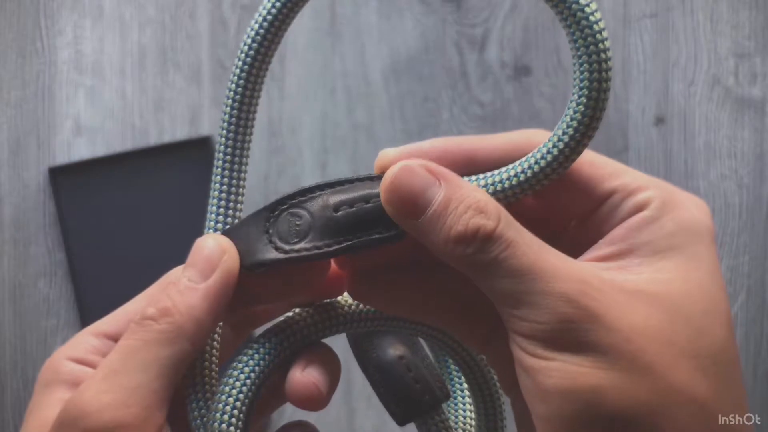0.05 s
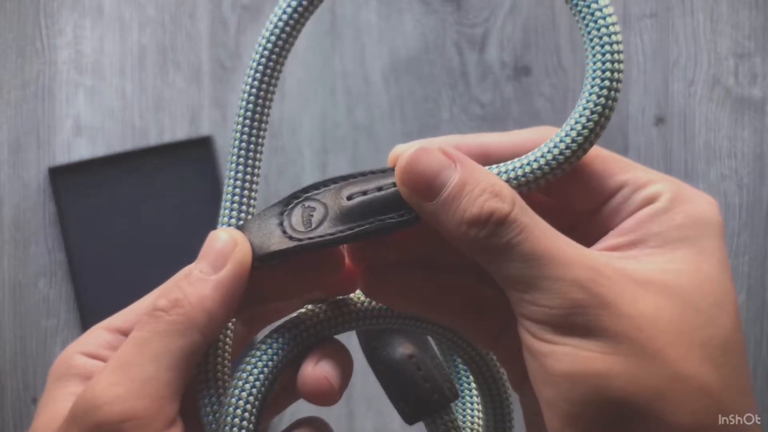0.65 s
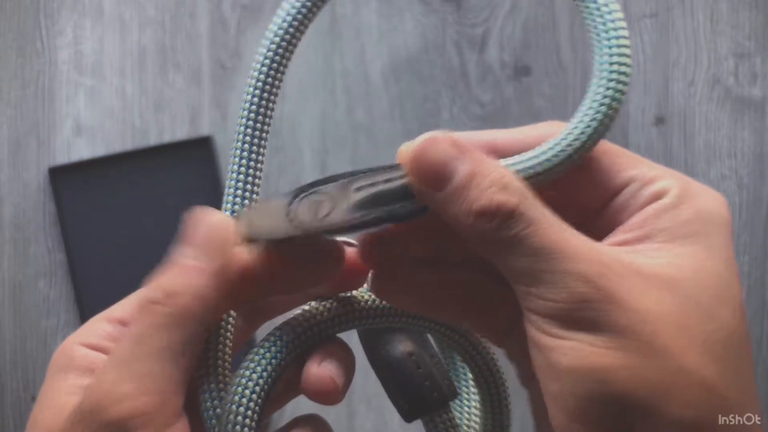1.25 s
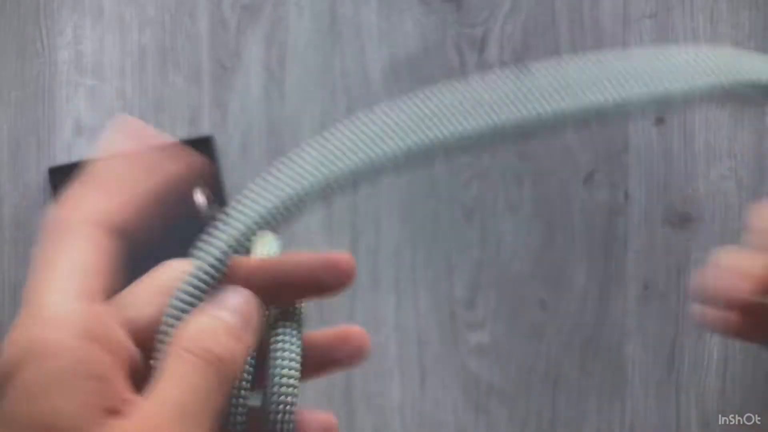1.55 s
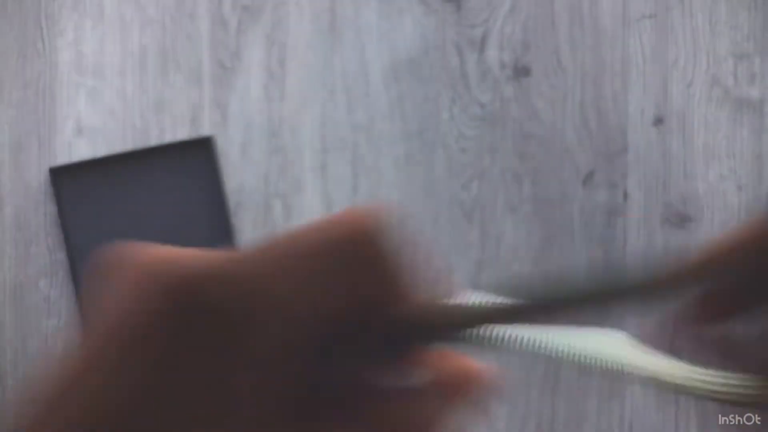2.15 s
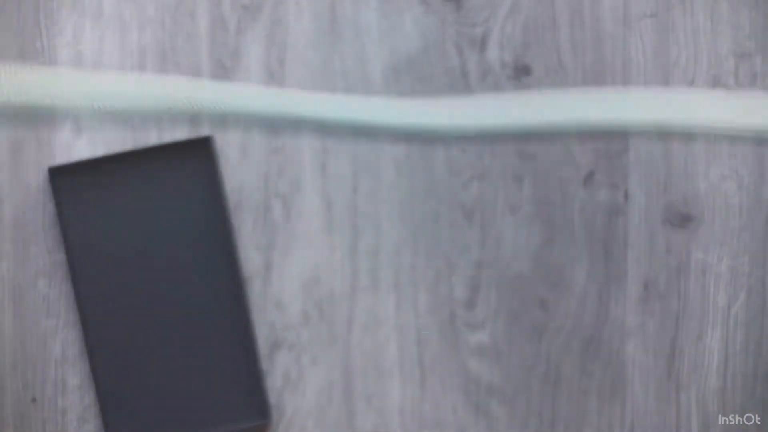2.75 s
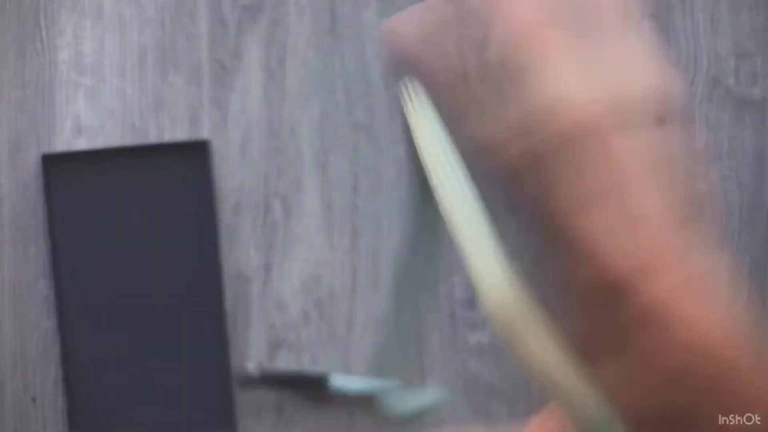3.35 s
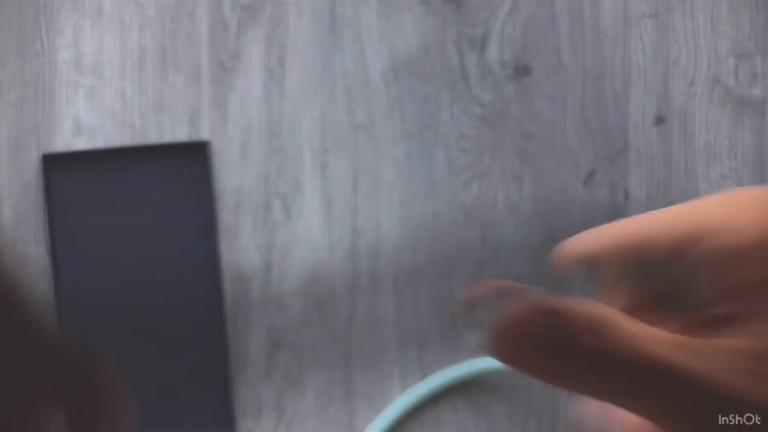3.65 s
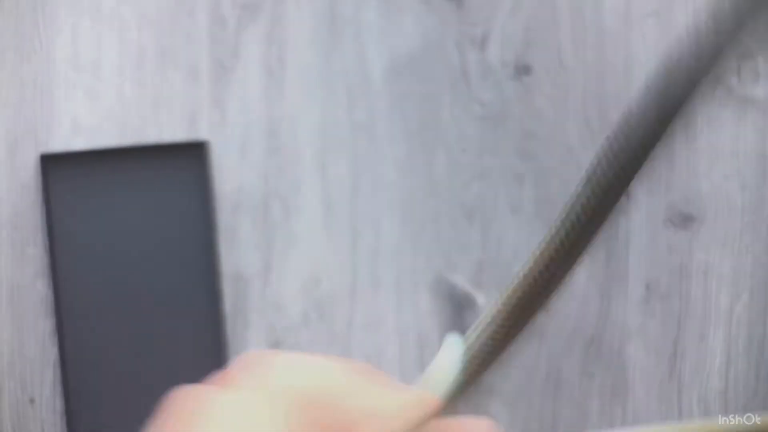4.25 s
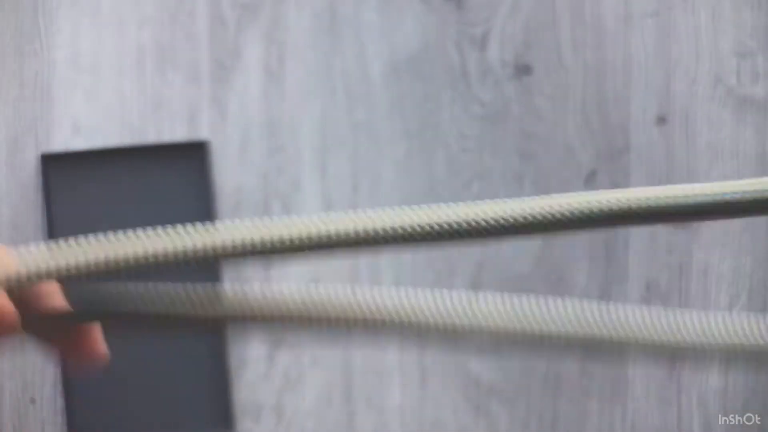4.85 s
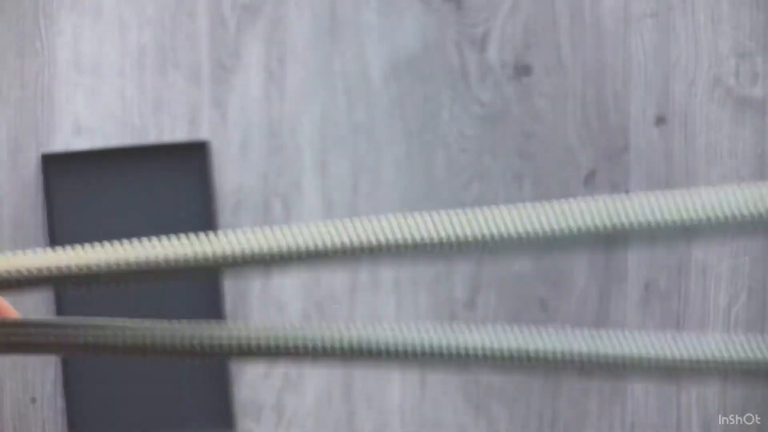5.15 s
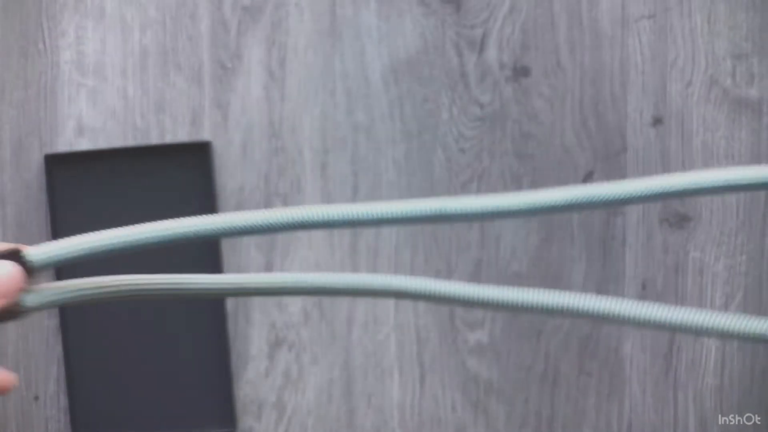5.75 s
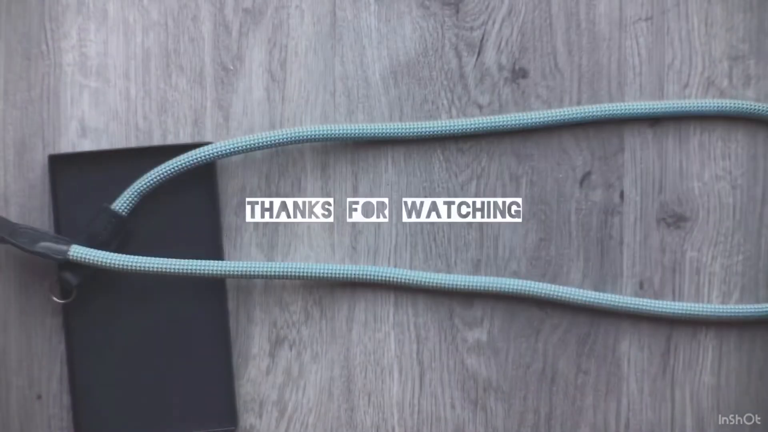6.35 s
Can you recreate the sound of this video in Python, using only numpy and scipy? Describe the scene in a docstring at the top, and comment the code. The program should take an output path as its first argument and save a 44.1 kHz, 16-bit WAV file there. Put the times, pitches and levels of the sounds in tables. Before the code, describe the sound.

In a small room with a faint machine hum, hands begin working a rope strap near the microphone. Quiet, uneven swishes of braid against skin mix with scattered light clicks from leather tips touching a wooden table and metal rings meeting. The sliding carries on for several seconds, then a strap end lands on the table with one loud clack, its steel fittings ringing for an instant.

```python
"""A low machine hum and faint hiss fill a small room. Close to the microphone, just above a wooden
table, a braided rope camera strap is uncoiled. Its leather ends tap the table, each touching twice,
the braid hisses through the fingers stroke by stroke, and the steel split rings tick together.
At last one end drops with a sharp clack. The steel rings on briefly and the room answers each tap."""
import sys
import numpy as np
from scipy import signal
from scipy.fft import rfft, irfft
from scipy.io import wavfile
from scipy.ndimage import uniform_filter1d

SR = 44100
rng = np.random.default_rng(int(sys.argv[2]) if len(sys.argv) > 2 else 0)


def transcribe(u):
    """Save the signal u as a 16-bit wav file named by the first command-line argument.

    u: samples, shape (n,) or (channels, n), limited to [-1, 1]; the rate is SR.
    q: integer samples, one column per channel.
    """
    v = np.clip(np.atleast_2d(u).T, -1, 1)
    q = np.round(v * 32767).astype(np.int16)
    wavfile.write(sys.argv[1], SR, q)


N = 281924
TIME = np.arange(N) / SR
GRID_HZ = np.maximum(np.arange(4097) * SR / 8192, 1)

# Machine hum in the room. Each row: frequency in Hz, rms level in dB.
HUM_LINES = [(48.5, -68), (48.93, -70.5), (81, -69), (226, -77), (269, -80.5)]
# Two swells of a low drone. Each row: peak in seconds, rise time in seconds, level in dB.
DRONE_RISES = [(.27, .3, -57), (2.98, 0.17, -52)]
# The room's still air and the microphone's hiss. Each row: frequency in Hz, relative level in dB.
AIR_COLOUR = [(22, -49), (36, -6), (60, -3.5), (100, -14), (140, 0.5), (180, -4), (230, -5), (330, -10.5),
              (500, -17), (900, -19.5), (1500, -29.5), (3000, -44.5)]
MIC_HISS_COLOUR = [(600, -14.5), (1800, 2), (3200, 0), (4600, -3.5), (6900, -5.5), (7350, 1), (7900, -6),
                   (8600, 3.5), (8950, -3.5), (9500, -2.5), (10500, -9), (12000, -7.5), (15500, -15)]
# Strap ends on the table, and at 1.289 and 1.3287 s two bright ticks of the steel rings. Each row: start in
# seconds, chatter fade in ms, knock pitch in Hz, table knock in dB, leather clack in dB, clack hardness in dB
# per octave, bright tick in dB, slap relative to the first touch in dB.
END_TAPS = [(1.012, 1.5, 900, -84, -73.5, 2, -77, -12), (1.289, 5, 850, -70, -70, 2, -58, -6),
            (1.3287, 2, 910, -64.5, -67, -3, -61, -10), (2.012, 3.3, 520, -49, -49.5, -2.5, -64, -1.5),
            (2.042, 7, 900, -53.5, -63, 0, -60, -4), (2.335, 9, 900, -63, -66, 0, -75, -4),
            (3.031, 2.9, 700, -68, -62, 0, -75, -10), (3.106, 2, 900, -82, -69, 2, -82, -8),
            (3.2356, 5.8, 355, -51.5, -56.5, -1, -51.5, 7.5), (3.252, 20, 555, -70, -51.5, 5, -47.5, -3),
            (3.279, 7.4, 600, -74, -46, 3.5, -42.5, 0.5), (3.390, 5.5, 590, -59, -59.5, -2, -60.5, -8),
            (4.560, 2.8, 840, -49.5, -56, 1, -56, 3.5), (5.199, 1.5, 1550, -80, -69, 5, -80, -12),
            (6.1304, 2.6, 700, -54, -52.5, -1.5, -52, -7), (6.1493, .9, 600, -54, -49, 0, -41.5, -3),
            (6.1665, 5.5, 696, -52, -46, 2, -44, -8), (6.1716, 4.2, 660, -37, -48, 2, -37, -1.5),
            (6.1937, 4.8, 720, -31.5, -20.8, 1.2, -22.8, -2.2), (6.2022, 1.8, 248, -45, -31.5, 1, -25, -9),
            (6.277, 4.5, 1010, -51, -40.5, .5, -58, -7)]
# The table's knock, with two broad resonances. Each row: multiple of its pitch, relative level in dB.
KNOCK_COLOUR = [(.25, -23), (.65, -15), (.9, -0.5), (1.07, -2), (1.4, -11.5), (1.95, -14), (2.45, -3.5),
                (3, -17), (6, -53)]
# The leather's clack and the bright tick. Each row: frequency in Hz, relative level in dB.
CLACK_COLOUR = [(600, -36), (1200, -3.5), (1550, -3.5), (1950, -1.5), (2600, 2), (3000, 3.5), (3500, 2),
                (4300, -5), (6000, -12.5), (12000, -18.5)]
TICK_COLOUR = [(2500, -23.5), (4500, -8), (6500, -3), (8300, 0.5), (10300, 2.5), (11500, 0.5), (13000, -4),
               (16000, -14)]
# Ringing of the steel fittings. Each row: frequency in Hz, relative level in dB, seconds to fall 60 dB.
STEEL_MODES = [(1110, -7, 0.29), (1390, -16, .25), (2162, 10, 0.22), (2464, -10, .3), (2810, 5.5, 0.33),
               (2800, -8, 0.28), (2980, -9, .3), (3330, -4, 0.21), (3400, -2, .34), (3660, 0, 0.23),
               (4500, -27, 0.18), (6294, -4, .25), (8250, -2, .2), (8650, 0, 0.13), (8940, 3, 0.18),
               (10500, 0, .14)]
# Reverberation of the small room. Each row: frequency in Hz, seconds to fall 60 dB.
ROOM_DECAY = [(200, 0.52), (1000, 0.39), (3000, 0.41), (6000, 0.39), (10000, 0.27), (15000, .18)]
# Pulls of rope through the hands. Each row: fastest moment in seconds, rise time in seconds,
# hiss in dB, rub of the grip relative to the hiss in dB.
ROPE_STROKES = [(1.41, 0, -73, -4), (1.485, .02, -63.5, -12), (1.695, 0.04, -64, -11),
                (1.765, .05, -62, -8.5), (1.838, 0.04, -62, -17), (1.995, 0.06, -63.5, -9),
                (2.185, 0.1, -60.5, -3.5), (2.315, 0.1055, -55.5, -2), (2.49, 0.05, -62.5, -4),
                (2.68, 0.15, -71.5, -5), (2.89, 0.2, -77, -7), (3.14, 0.1, -72, 0), (3.53, .08, -78, 3),
                (3.675, 0.07, -66, -3), (3.85, .06, -69.5, -1), (4.08, 0.04, -64, -6.5),
                (4.165, .05, -68.5, -3), (4.355, .115, -55, -6), (4.54, .1, -63, -.5),
                (4.818, .065, -62, -6.5), (4.995, 0.08, -60.5, -9), (5.11, .025, -70, -14),
                (5.243, .04, -60, -10), (5.44, .035, -65, -4), (5.56, 0.08, -68.5, -.5),
                (5.672, .04, -63.5, -3), (5.74, 0.24, -75, 4), (6.001, .022, -65, -10)]
# The braid's hiss and the grip's duller rub. Each row: frequency in Hz, relative level in dB.
BRAID_COLOUR = [(1500, -25), (4200, -12.5), (6200, -5), (7800, 0.5), (9000, 3), (10300, 1), (11500, -2.5),
                (15500, -10.5)]
GRIP_COLOUR = [(400, -21), (1000, -8), (1600, -9.5), (2000, -3), (2450, -0.5), (2900, 1), (3500, -0.5),
               (4200, -6.5), (5300, -3.5), (8000, -16.5)]
# Split rings meeting. Each row: start in seconds, chatter fade in ms, tick in dB, leather clack in dB.
SPLIT_RING_TICKS = [(1.516, 10, -53.5, -65), (2.777, .45, -42.5, -66.5), (3.789, 5.3, -51, -56)]
# The weave crossing a finger. Each row: peak in seconds, rise time in seconds, level in dB,
# pitch in Hz, glide in octaves per second.
WEAVE_RASPS = [(2.33, .1, -65, 2544, 1.7), (4.39, .14, -73, 2850, .1), (4.85, 0.056, -72, 2990, 0)]


def undb(db):
    """Decibels to gain."""
    return 10 ** (np.asarray(db) / 20)


def unit(x):
    """Scale to rms 1."""
    return x / np.sqrt(np.mean(x ** 2))


def outline(points, tilt_db=0):
    """Gain over frequency from (Hz, dB) points, tilted per octave, with unit power."""
    hz, db = np.transpose(points)
    return unit(undb(np.interp(np.log2(GRID_HZ), np.log2(hz), db + tilt_db * np.log2(hz))))


def colour(x, gain):
    """Causal filter with the given gain, built from its cepstrum; the result has rms 1."""
    cepstrum = irfft(np.log(gain))
    cepstrum[1:len(gain) - 1] *= 2
    cepstrum[len(gain):] = 0
    response = irfft(np.exp(rfft(cepstrum)))
    return unit(signal.fftconvolve(x, response)[:len(x)])


def wander(rate):
    """Smooth random drift of rms 1 that turns about rate times a second."""
    hold = int(SR / rate)
    steps = np.repeat(rng.standard_normal(N // hold + 1), hold)
    return unit(uniform_filter1d(steps, hold)[:N])


def grains(size, rate, scatter_db):
    """Tiny impulses of uneven strength at random moments, about rate a second."""
    hits = rng.random(size) < rate / SR
    return hits * rng.standard_normal(size) * undb(scatter_db * rng.standard_normal(size))


def swells(rows, fall_over_rise=1.17, roundness=1.36):
    """Gain over time from (peak s, rise s over the last 10 dB, dB) swells, whose powers add."""
    t, power = TIME[::64], 0
    for peak_s, rise_s, db in rows:
        away = np.maximum(peak_s - t, (t - peak_s) / fall_over_rise) / rise_s
        power = power + undb(db - 10 * np.minimum(away, 10) ** roundness) ** 2
    return np.interp(TIME, t, np.sqrt(power))


def add(out, start_s, sound):
    """Mix a sound in at its start time."""
    part = out[int(start_s * SR):int(start_s * SR) + len(sound)]
    part += sound[:len(part)]


def machine_hum():
    """A machine's lines waver in level and phase; the two lowest beat slowly."""
    out = 0
    for k, (hz, db) in enumerate(HUM_LINES):
        amplitude = np.sqrt(2) * undb(db + 1.7 * wander(rate=3))
        phase = 2 * np.pi * hz * TIME + 0.0045 * hz * wander(rate=4.4)
        out = out + (-1) ** k * amplitude * np.sin(phase)
    return out


def drone(hz=143.5, steady_db=-63.5):
    """A low, slightly unsteady tone sits in the room and swells twice."""
    phase = 2 * np.pi * np.cumsum(hz + 8 * wander(rate=24)) / SR
    level = np.hypot(undb(steady_db), swells(DRONE_RISES)) * undb(2 * wander(rate=8.2))
    return np.sqrt(2) * np.sin(phase) * level


def noise_floor():
    """The room's still air rumbles under the microphone's own hiss."""
    rumble = undb(-59.0) * colour(rng.standard_normal(N), outline(AIR_COLOUR))
    hiss = undb(-73.5) * colour(rng.standard_normal(N), outline(MIC_HISS_COLOUR))
    return rumble + hiss


def contact(fade_ms, *colours):
    """A first touch and a fading chatter of smaller ones; levels are rms over 10 ms."""
    t = TIME[:SR // 10]
    chatter = grains(len(t), rate=16000, scatter_db=1.5) * np.exp(-1000 * t / fade_ms)
    chatter[0] += 1.2
    power = np.sum(np.square(colours), axis=0)
    # even out the chatter's spectrum, so the colour belongs to the things that meet
    uneven = unit(np.abs(rfft(chatter, 2 * len(GRID_HZ) - 2))) ** 2 + 0.65
    return colour(chatter, np.sqrt(power / uneven)) * np.sqrt(power.mean() / 10)


def leather_taps(slap_delay_s=.0042, slap_pitch_ratio=1.557):
    """Each leather end lands on its edge, then slaps flat on the table with a higher knock."""
    out = np.zeros(N)
    for start_s, fade_ms, knock_hz, knock_db, clack_db, hardness_db, tick_db, slap_db in END_TAPS:
        clack = undb(clack_db) * outline(CLACK_COLOUR, hardness_db)
        tick = undb(tick_db) * outline(TICK_COLOUR, tilt_db=-5.5)
        for delay_s, hz, db in ((0, knock_hz, 0), (slap_delay_s, knock_hz * slap_pitch_ratio, slap_db)):
            knock = undb(knock_db) * outline([(hz * ratio, level) for ratio, level in KNOCK_COLOUR])
            add(out, start_s + delay_s, undb(db) * contact(fade_ms, knock, clack, tick))
    return out


def steel_ringing(blows, ring_db):
    """The steel fittings ring on briefly after every blow."""
    t = TIME[:SR // 2]
    ring = sum(undb(db - 60 * t / t60) * np.sin(2 * np.pi * hz * t) for hz, db, t60 in STEEL_MODES)
    return undb(ring_db) * signal.fftconvolve(blows, ring / np.linalg.norm(ring))[:N]


def small_room(x, tail_db, early_db, early_fade_s):
    """Quick reflections off the table top reach the microphone, then a tail whose treble dies first."""
    t = TIME[:SR // 2]
    hz, t60s = np.transpose(ROOM_DECAY)
    noise = rfft(rng.standard_normal(len(t)))
    grid_hz = np.linspace(0, SR / 2, len(noise))
    bands = [irfft(noise * np.interp(grid_hz, hz, share), len(t)) for share in np.eye(len(hz))]
    tail = sum(band * undb(-60 * t / t60) for band, t60 in zip(bands, t60s))
    tail *= np.minimum(t / 0.012, 1)
    early = grains(len(t), rate=4200, scatter_db=4.5) * np.exp(-t / early_fade_s) * (t > .001)
    response = undb(tail_db) * tail / np.linalg.norm(tail) + undb(early_db) * early / np.linalg.norm(early)
    return signal.fftconvolve(x, response)[:N]


def rope_slide():
    """Fibres of the braid catch and slip under the skin; a firmer grip adds a duller rub."""
    hiss = swells([(s, rise_s, db) for s, rise_s, db, _ in ROPE_STROKES])
    rub = swells([(s, rise_s, db + grip_db) for s, rise_s, db, grip_db in ROPE_STROKES])
    out = 0
    for gain, points in ((hiss, BRAID_COLOUR), (rub, GRIP_COLOUR)):
        brightness_db = 2.0 * wander(rate=7)  # the rope rolls in the fingers
        for side in (-1, 1):  # dull half, bright half
            slips = colour(grains(N, rate=16000, scatter_db=0.8), outline(points, tilt_db=3.5 * side))
            out = out + slips * gain * undb(side * brightness_db) / np.sqrt(2)
    return out


def split_ring_ticks(rebound_s=.0031, rebound_db=-1):
    """In mid-air a split ring strikes its neighbour and rebounds once, brighter than a tap."""
    out = np.zeros(N)
    for start_s, fade_ms, tick_db, clack_db in SPLIT_RING_TICKS:
        tick = undb(tick_db) * outline(TICK_COLOUR, tilt_db=7.5)
        clack = undb(clack_db) * outline(CLACK_COLOUR)
        add(out, start_s, contact(fade_ms, tick, clack))
        add(out, start_s + rebound_s, undb(rebound_db) * contact(fade_ms, tick, clack))
    return out


def weave_rasps():
    """The weave rasps over a finger in a narrow band that swells and fades; the first rasp glides up."""
    out = 0
    for peak_s, rise_s, db, hz, glide in WEAVE_RASPS:
        octaves = glide * np.clip(TIME - peak_s, -2 * rise_s, 2 * rise_s)
        # the strands pass unevenly, which smears the rasp into a narrow band
        pitch_hz = hz * 2 ** octaves * (1 + .04 * wander(rate=400))
        rasp = unit(np.sin(2 * np.pi * np.cumsum(pitch_hz) / SR) * wander(rate=350))
        out = out + rasp * swells([(peak_s, rise_s, db)])
    return out


def scene():
    """One microphone close to the strap, with the room behind it."""
    background = machine_hum() + drone() + noise_floor()
    sliding = (rope_slide() + weave_rasps()) * undb(1.16 * wander(rate=45))  # the level flutters
    blows = leather_taps() + split_ring_ticks()
    strap = sliding + blows + steel_ringing(blows, ring_db=-24.5)
    # the strap swings once past the microphone, where the room counts less
    near_s, near_rise_s, near_room_db = 2.87, 0.13, -11
    into_room = strap * undb(near_room_db * swells([(near_s, near_rise_s, 0)]))
    reflections = small_room(into_room, tail_db=-8, early_db=-8.5, early_fade_s=0.014)
    return (strap + reflections + background)[None]


def record(dry):
    """The recorder rounds the loudest peaks and cuts the top of the treble."""
    ceiling, top_hz = 0.67, 15800
    lowpass = signal.ellip(10, .2, 70, top_hz, fs=SR, output="sos")
    return signal.sosfilt(lowpass, ceiling * np.tanh(dry / ceiling))


dry = scene()
out = record(dry)
transcribe(out)
```